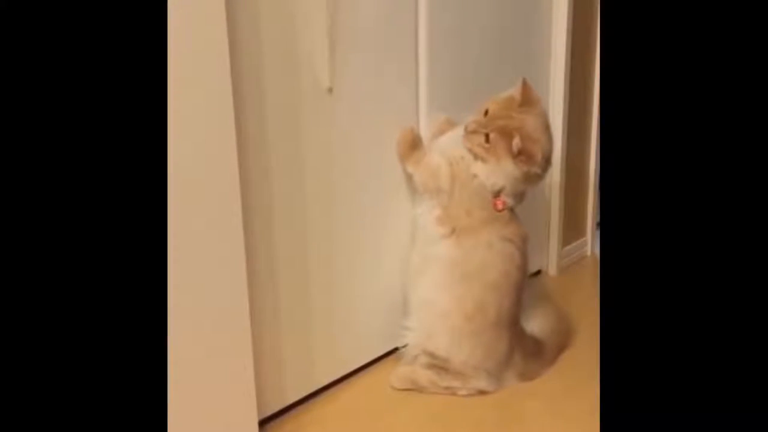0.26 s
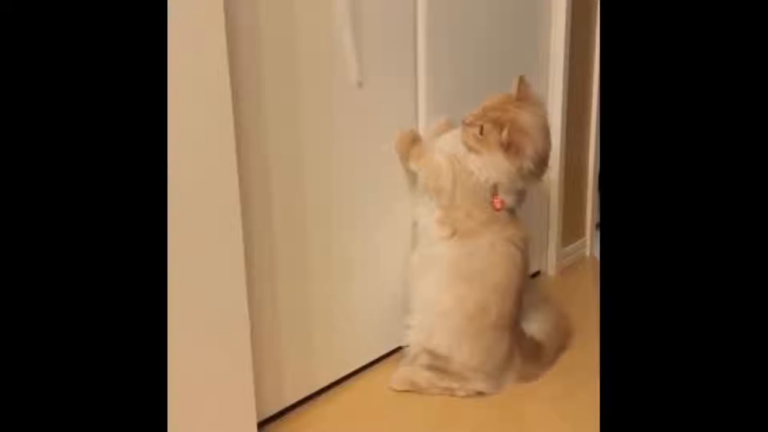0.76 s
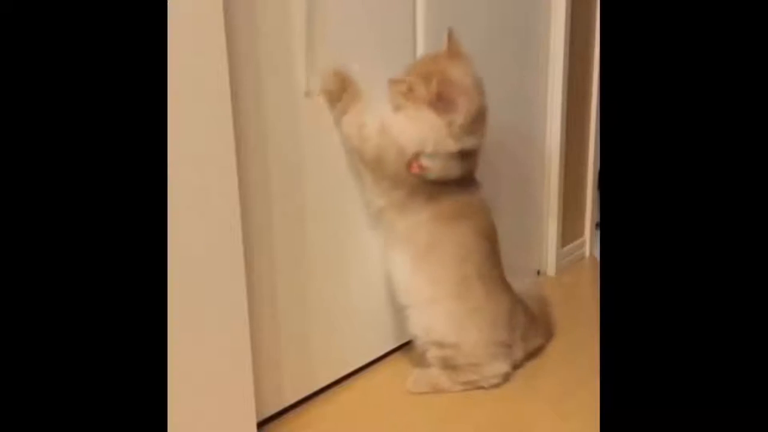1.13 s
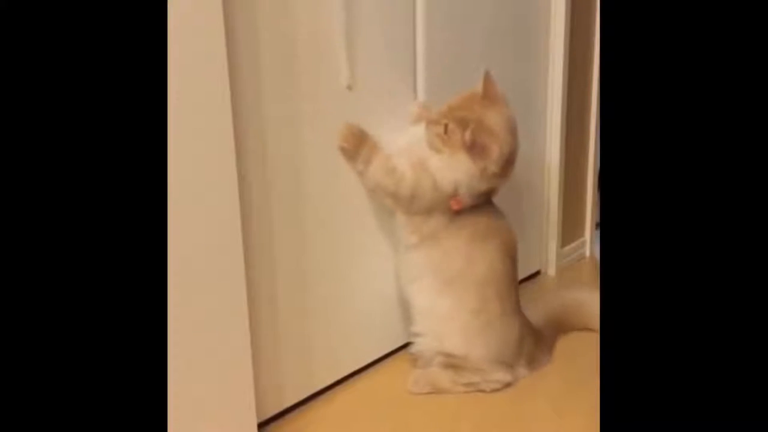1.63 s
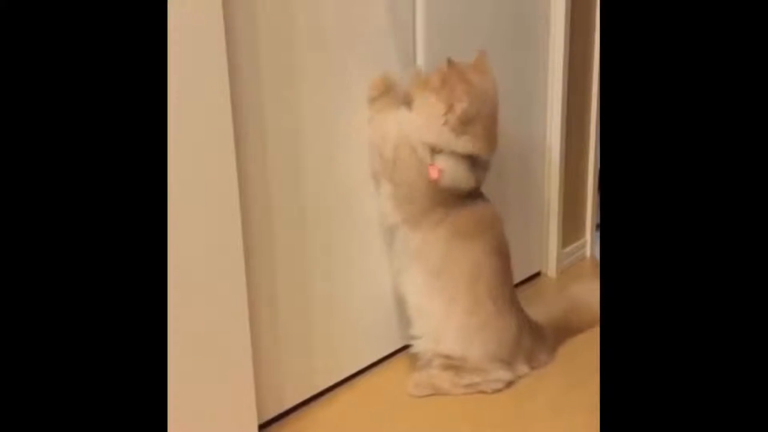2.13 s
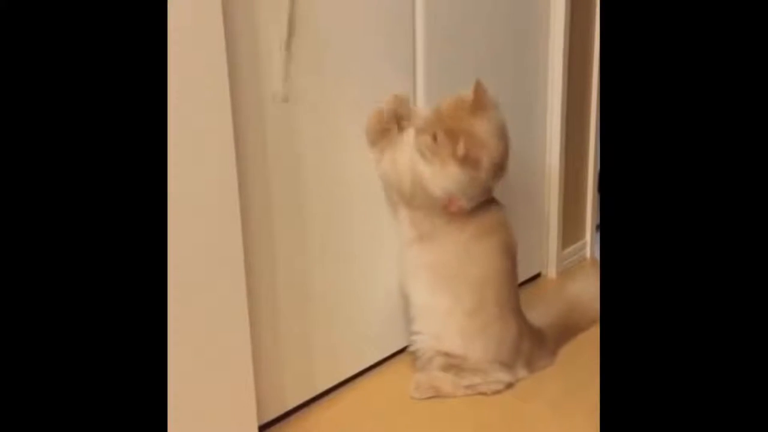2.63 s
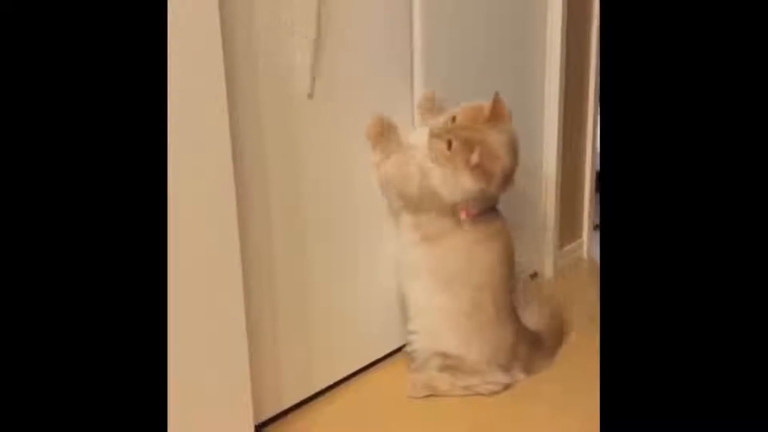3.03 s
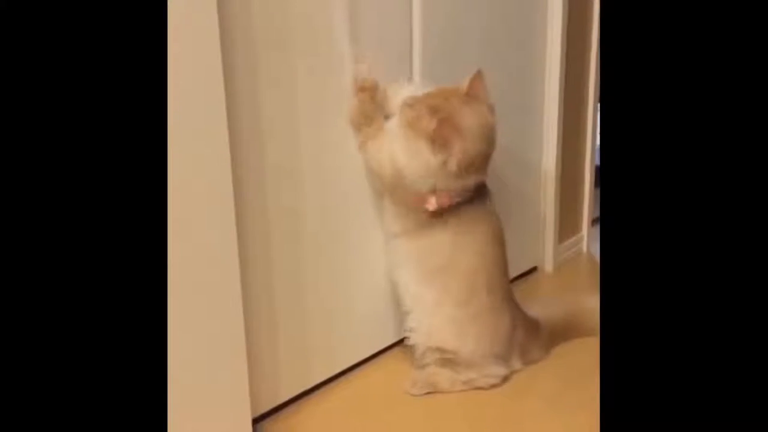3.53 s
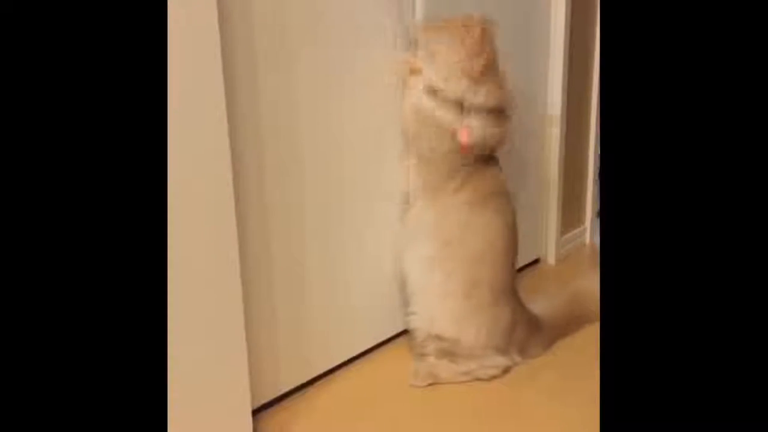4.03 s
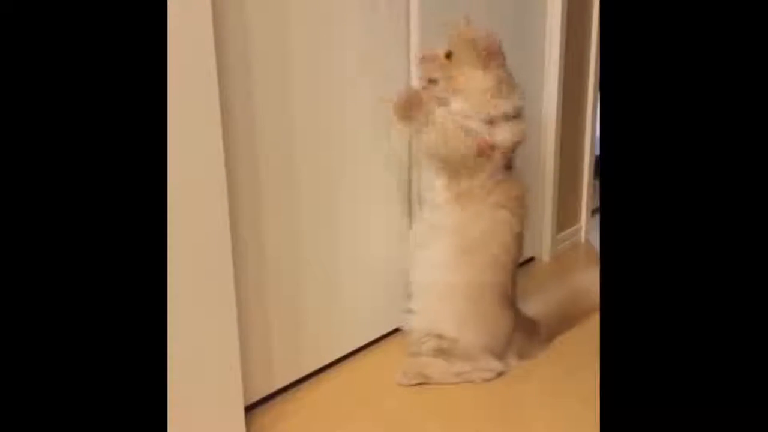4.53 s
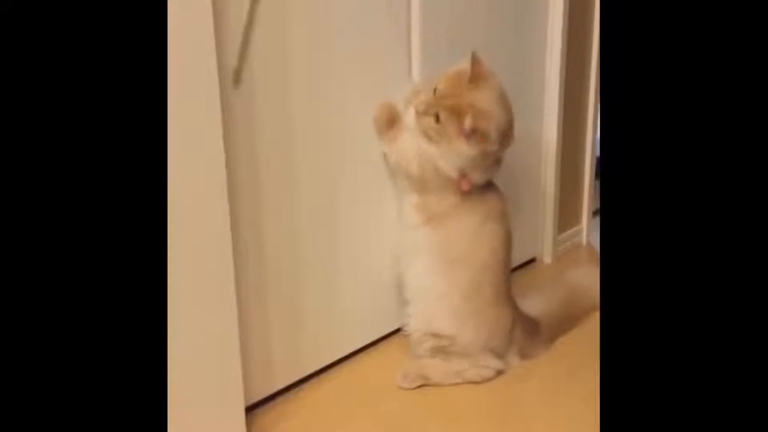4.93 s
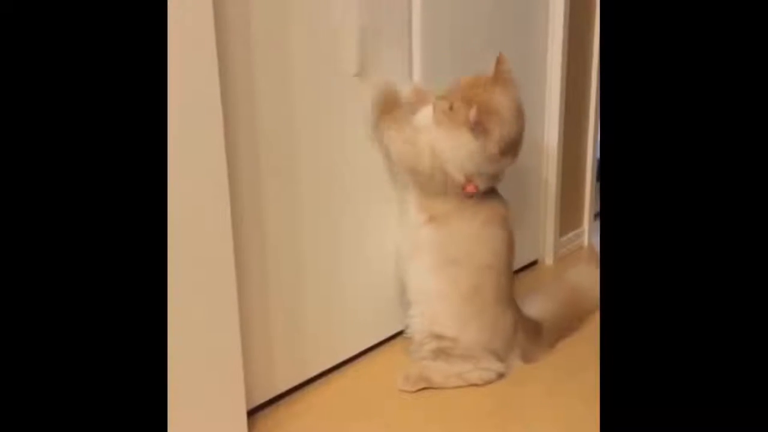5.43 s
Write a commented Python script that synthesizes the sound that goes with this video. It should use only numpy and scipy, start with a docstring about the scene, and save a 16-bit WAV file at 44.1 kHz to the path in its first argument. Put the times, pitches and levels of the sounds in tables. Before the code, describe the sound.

A faint, low electrical hum with rumble and hiss runs throughout in a small room. Around 0.5 seconds a cat's claws brush very softly on a closet door. From 1 to 1.4 seconds come short scratches, soft paw thuds, light knocks and muffled clinks of its collar bell. Just after 2 seconds the claws rasp harder and the small, high bell jingles brightly, with a thud and a loud clack of the loose door at 2.3 seconds. Light taps follow, then a short lull. Sharp scratches at 3.4 seconds lead into a quick cluster of hard knocks at 3.5. The bell then jingles busily until about 4.7 seconds, with lighter scrapes and another thud and knock near 4.3. One more knock lands at 5 seconds, followed by softer jingles, a tap and faint clinks until about 5.6.

```python
"""In a small room, a cat stands up and paws at a closet door.
Its claws stick and slip down the panel, its soft paws thud, and the loose door knocks in its track.
A pellet in the bell on its collar hits the shell as the cat moves: a bright jingle, or a dull clink
when fur presses on the bell. A low, steady electrical hum, a rumble and a faint hiss lie underneath."""
import sys
import numpy as np
from scipy import signal
from scipy.fft import next_fast_len
from scipy.io import wavfile
from scipy.ndimage import uniform_filter1d

SR = 44100
rng = np.random.default_rng(int(sys.argv[2]) if len(sys.argv) > 2 else 0)


def generate_wav(signal):
    """Clip the signal to [-1, 1] and save it as 16-bit WAV at the path in sys.argv[1]."""
    frames = np.transpose(np.atleast_2d(signal))
    scaled = np.clip(frames, -1, 1) * 32767
    pcm = np.round(scaled).astype(np.int16)
    wavfile.write(sys.argv[1], SR, pcm)


N = 250488
AGE = np.arange(SR // 2) / SR  # seconds since a hit

# Table levels are relative. ring_s is the time a sound takes to die away by 60 dB.
# The tones of an electrical hum, as from a compressor motor and the mains: pitch_hz, level_db
HUM_TONES = [(59.2, -59), (118.4, -54.5), (177.6, -69.5), (296.1, -85), (398.4, -87), (473.7, -91.5),
             (597.5, -86.5)]
# Tone colour (how strong each pitch is) of the rumble and the hiss: pitch_hz, level_db
RUMBLE_COLOUR = [(15, -22), (35, -2.5), (60, 4.5), (110, 0.5), (170, -1.5), (260, -22.5), (500, -56)]
HISS_COLOUR = [(130, -37.5), (220, -3), (397, -4), (426, -9.5), (464, -6), (603, -10), (756, -11),
               (1070, -14.5), (2180, -15.5), (4600, -18), (14000, -24)]

# Claw strokes: hardest_pull_s, level_db, swell_s, fade_s, fizz_db (added to level_db), pitch_hz
CLAW_STROKES = [(.365, -72.5, .05, 0.17, -20, 1950), (0.505, -64, 0.088, 0.13, -23, 1476),
                (1.021, -64.5, 0.034, 0.022, -9, 1480), (1.098, -56.5, .012, .04, -15, 1550),
                (1.14, -45, .045, 0.032, -17.5, 1610), (1.224, -47, 0.024, 0.033, -12, 1600),
                (1.735, -67.5, .09, 0.1, -28, 1420), (2.119, -41, 0.024, 0.076, -14, 1944),
                (2.218, -42.5, 0.055, 0.057, -9.5, 2115), (3.21, -67.5, .2, 0.13, -14, 2330),
                (3.258, -60.5, .025, 0.026, -22, 1850), (3.368, -38, .026, 0.013, -12.5, 1590),
                (3.399, -41.5, 0.028, 0.035, -7.5, 1963), (3.694, -47, 0.023, 0.021, -8.5, 1590),
                (3.882, -55, 0.081, 0.098, -23, 1900), (4.021, -59, 0.061, 0.018, -8, 1900)]
# Tone colour of the scraped panel and of the claws' high fizz: pitch_hz, level_db
SCRAPE_COLOUR = [(300, -23), (1100, -17), (1440, 3.5), (1780, -10.5), (2200, -3), (3000, -3.5), (4500, -3),
                 (7000, -13)]
FIZZ_COLOUR = [(2000, -2), (3800, 10.5), (5200, 9.5), (8000, 5), (10500, -4.5), (14000, -9)]

LOW_HZ, HIGH_HZ, DAMPED_HZ = 5594, 13852, 6290  # the bell's two notes, and its note against fur
# Clinks of the bell against fur: start_s, tone_db, tick_db
BELL_CLINKS = [(1.0221, -69.5, -68), (1.299, -59, -66), (1.3285, -64, -74), (2.713, -84, -61),
               (3.289, -68, -68), (3.343, -50.5, -62), (3.4125, -50, -56), (3.861, -64, -67),
               (4.7227, -65, -63), (4.891, -63, -57), (4.9477, -78, -61), (5.1659, -61, -60.5),
               (5.598, -66, -60.5), (5.638, -64, -60.5)]
# The tones of the muffled bell: pitch_hz, level_db, ring_s
MUFFLED_TONES = [(DAMPED_HZ, 0, 0.073), (DAMPED_HZ + 110, -10, 0.034)]
# Tone colour of the pellet rattling on the shell: pitch_hz, level_db
RATTLE_COLOUR = [(2000, -14), (4800, -8), (5600, -2), (6400, 4), (7400, -2), (7900, 5.5), (8400, 3),
                 (9000, 0.5), (9600, -9.5), (12800, -11), (13800, -6)]

# Knocks of the door in its track: start_s, level_db, crack_db, wood_db (both added to level_db), pitch_hz
DOOR_KNOCKS = [(1.2245, -43.5, -27, -18, 1550), (1.3102, -50, -18, -9, 1710), (1.773, -55, -28, -25, 1370),
               (2.3126, -35.5, -8, -7, 2070), (2.3153, -28, -17, -13, 1600),
               (2.5895, -49.5, -25, -13.5, 2400), (2.7511, -51, -16, -7, 2190),
               (3.499, -34, -3.5, -19, 2000), (3.5057, -32.5, -17, -17, 1740),
               (3.5217, -31.5, -13.5, -19.5, 1800), (4.0247, -51, -3, -11.5, 1830),
               (4.3186, -35, -14.5, -11.5, 2030), (4.3792, -41, -20, -18, 1530),
               (4.9924, -37.5, -17, -15, 1960), (5.306, -49.5, -16.5, -21, 2430)]
# Tone colour of the panel's clack, the hard crack and the hollow wood: pitch_hz, level_db
PANEL_COLOUR = [(500, -34), (1100, -8.5), (1450, -5), (2000, -4.5), (2600, -8.5), (3200, -4.5), (3650, -11),
                (4050, -8), (5000, -12), (8000, -14.5)]
CRACK_COLOUR = [(1500, -1), (3200, 4.5), (4200, 0.5), (5200, 0.5), (8000, 1.5), (10500, -6.5), (14000, -7)]
WOOD_COLOUR = [(150, -6), (260, -2), (400, 0.5), (600, -2.5), (790, -1.5), (980, -0.5), (1200, -6.5),
               (1600, -8), (3000, -26.5)]

# A paw lands and shoves the door, or the door settles back after a shove: start_s, thud_db, sway_db
DOOR_THUMPS = [(1.228, -47, -46), (1.308, -40, -34.5), (1.402, -60, -54), (2.096, -40, -54),
               (2.305, -37.5, -48), (3.499, -40, -43), (4.317, -43, -46), (4.8227, -59.5, -55)]
# The tones of the door as it bends, and as all of it sways: pitch_hz, level_db, ring_s
BEND_TONES = [(107.3, -8.5, 0.48), (146, -11, 0.18), (199, 4.5, 0.06), (228.3, -2.5, 0.082),
              (252.5, 2, 0.069), (288.2, 1, 0.096), (371.6, -11, 0.14), (465, -13, 0.085)]
SWAY_TONES = [(35.5, 1, 0.56), (55.2, 17, 0.35), (73, 15, 0.78)]

# The pellet hits the free bell: start_s, level_db, high_note_db (added to level_db)
BELL_JINGLES = [(2.126, -47.5, -27), (2.1455, -48.5, -12), (2.191, -49, -26), (2.2085, -52, -29),
                (2.37, -46, -22), (2.388, -49.5, -8), (2.5168, -52, -21), (3.5516, -50, -11),
                (3.5833, -46.5, -14), (3.605, -41, -17), (3.664, -49.5, -5.5), (3.7175, -47.5, -10),
                (3.7877, -57, -8), (3.9058, -52, -22), (4.0435, -47, -10), (4.0891, -49.5, -7),
                (4.144, -48.5, -8.5), (4.2994, -51, -12), (4.337, -43, -14), (4.4144, -42.5, -23),
                (4.4428, -45.5, -12), (4.481, -48.5, -20), (4.5053, -41, -16), (4.571, -53.5, -17),
                (4.695, -52.5, -20), (5.0501, -50, -28), (5.1002, -57, -28), (5.1932, -55, -17)]
# The close tones that make up the bell's low note and high note: pitch_hz, level_db, ring_s
LOW_NOTE_TONES = [(LOW_HZ, 0, 0.11), (LOW_HZ - 60, -9.5, 0.022), (LOW_HZ + 130, -4, 0.02)]
HIGH_NOTE_TONES = [(HIGH_HZ, 0, 0.25), (HIGH_HZ - 110, -3, 0.059)]

# How long the room echoes: pitch_hz, ring_s
ROOM_ECHO = [(100, 0.39), (500, 0.3), (2000, 0.24), (6000, 0.33), (14000, 0.16)]


def gain_of(db):
    """Turns decibels into a number to multiply a sound by."""
    return 10 ** (np.asarray(db) / 20)


def evened(x):
    """Scales a sound so that its average strength (rms) is 1."""
    return x / np.sqrt(np.mean(x ** 2) + 1e-20)


def struck(x, size=441):
    """Scales a hit so that its loudest moment has strength 1."""
    return x / np.sqrt(uniform_filter1d(x ** 2, size, mode="constant").max() + 1e-20)


def look_up(points, hz):
    """Reads a table at any pitch, blending between its rows."""
    pitches, values = np.transpose(points)
    return np.interp(np.log(hz + 1), np.log(pitches + 1), values)


def add(mix, start_s, sound):
    """Mixes a sound in at the given time."""
    part = mix[max(round(start_s * SR), 0):][:len(sound)]
    part += sound[:len(part)]


def colour(x, points):
    """Gives a sound a tone colour without smearing it back in time."""
    size = next_fast_len(len(x) + 2048)
    hz = abs(np.fft.fftfreq(size, 1 / SR))
    log_gain = np.log(gain_of(look_up(points, hz)))
    response = np.exp(np.conj(signal.hilbert(log_gain)))
    return np.fft.ifft(np.fft.fft(x, size) * response).real[:len(x)]


def drift(rate_hz, count=12):
    """A random wobble of strength 1, no faster than rate_hz."""
    t = np.arange(0, N, 128) / SR
    slow = sum(np.sin(2 * np.pi * (rate_hz * rng.uniform(.1, 1) * t + rng.random()))
               for _ in range(count))
    return np.interp(np.arange(N) / SR, t, evened(slow))


def ring(tones, spread_db=0.):
    """A hit object rings with dying tones; where it is hit changes how loud each one is."""
    return sum(gain_of(db + spread_db * rng.standard_normal() - 60 * AGE / ring_s)
               * np.sin(2 * np.pi * hz * AGE) * (-1) ** k
               for k, (hz, db, ring_s) in enumerate(tones))


def burst(points, ring_s):
    """Many close tones dying together sound like a puff of noise."""
    noise = rng.standard_normal(len(AGE)) * gain_of(-60 * AGE / ring_s)
    return struck(colour(noise, points))


def resonate(x, hz, width_hz):
    """Brings out a band around one pitch, which may slide."""
    turn = np.exp(2j * np.pi * np.cumsum(hz * np.ones(len(x))) / SR)
    decay = np.exp(-np.pi * width_hz / SR)
    return (turn * signal.lfilter([1 - decay], [1, -decay], x / turn)).real


def background(waver_db=1.65, rumble_db=-63, hiss_db=-70.5):
    """A low electrical hum wavers a little over the room's rumble and hiss."""
    t = np.arange(N) / SR
    hum = sum(gain_of(db + waver_db * drift(8.8))
              * np.sqrt(2) * np.sin(2 * np.pi * (hz * t + rng.random())) for hz, db in HUM_TONES)
    rumble = evened(colour(rng.standard_normal(N), RUMBLE_COLOUR))
    hiss = evened(colour(rng.standard_normal(N), HISS_COLOUR))
    return hum + gain_of(rumble_db) * rumble + gain_of(hiss_db) * hiss


def panel_ringing(x, ring_s=0.033, share=0.87):
    """Adds the short, uneven ringing of the panel where the claws touch it."""
    tail = rng.standard_normal(len(AGE)) * gain_of(-60 * AGE / ring_s)
    return x + share * signal.fftconvolve(x, tail / np.linalg.norm(tail))[:len(x)]


def claw_scrapes(slips_per_s=1800, grit=0.074, waver_db=2.14, sink_octaves_per_s=1.2, hard_pull_db=-43):
    """Claws stick and slip, which rings the panel; the pitch sinks as the paw slides down."""
    out = np.zeros(N)
    for pull_s, level, swell_s, fade_s, fizz_db, pitch_hz in CLAW_STROKES:
        t = np.arange(-1.6 * swell_s, 1.6 * fade_s, 1 / SR)
        # the uneven pull rises 20 dB in swell_s and falls 20 dB in fade_s
        pull_db = level - 20 * np.maximum(-t / swell_s, t / fade_s) + waver_db * drift(45)[:len(t)]
        centre_hz = pitch_hz * 2 ** (-sink_octaves_per_s * t)
        sizes = gain_of(0.5 * np.minimum(rng.exponential(1, SR), 3)) * rng.choice([-1, 1], SR)
        slips = sizes * (rng.random(SR) < slips_per_s / SR)
        rubbing = (slips + grit * rng.standard_normal(SR))[:len(t)]
        panel = resonate(colour(rubbing, SCRAPE_COLOUR), centre_hz, width_hz=1700)
        # a harder pull rings a wider band of pitches
        panel = resonate(panel, centre_hz, width_hz=3600 * gain_of(0.67 * (level - hard_pull_db)))
        squeak = evened(resonate(panel, centre_hz, width_hz=25))
        rasp = evened(evened(panel_ringing(panel)) + 0.5 * squeak)
        fizz = gain_of(fizz_db + 1) * evened(colour(rubbing, FIZZ_COLOUR))
        loudness = gain_of(pull_db - 1) * signal.windows.tukey(len(t), .08)
        add(out, pull_s + t[0], loudness * (rasp + fizz))
    return out


def bell_echo(hz, width_hz, ring_s, swell_s=0.014):
    """A note of the moving bell comes back from the walls as a shimmer around its pitch."""
    decay = np.exp(-np.pi * width_hz / SR)
    shimmer = rng.standard_normal((2 * len(AGE), 2)) @ [1, 1j]
    for _ in range(2):
        shimmer = signal.lfilter([1 - decay], [1, -decay], shimmer)
    wave = (shimmer[len(AGE):] * np.exp(2j * np.pi * hz * AGE)).real
    return evened(wave) * gain_of(-60 * AGE / ring_s) * (1 - np.exp(-AGE / swell_s))


def bell_clinks(swell_s=.002):
    """Pressed into the fur, the bell gives only a short clink and a tick of the pellet."""
    out = np.zeros(N)
    swell = 1 - np.exp(-AGE / swell_s)
    for start_s, tone_db, tick_db in BELL_CLINKS:
        tone = struck(ring(MUFFLED_TONES)) + gain_of(-9) * bell_echo(DAMPED_HZ, 190, ring_s=0.35)
        tick = burst(RATTLE_COLOUR, ring_s=0.1)
        add(out, start_s, (gain_of(tone_db - 1) * tone + gain_of(tick_db - 1) * tick) * swell)
    return out


def door_knocks(hard_knock_db=-30, wood_swell_s=0.003):
    """The loose door hits its track: a hard crack, a clack of the panel and a hollow wooden note."""
    out = np.zeros(N)
    for start_s, level, crack_db, wood_db, pitch_hz in DOOR_KNOCKS:
        # a gentle knock rings a narrower band and takes longer to land
        width_hz = 550 * gain_of(0.12 * (level - hard_knock_db))
        landing_s = 0.00074 * gain_of(0.24 * (hard_knock_db - level))
        clack = gain_of(-6) * struck(resonate(burst(PANEL_COLOUR, ring_s=0.039), pitch_hz, width_hz))
        crack = gain_of(crack_db + 1) * burst(CRACK_COLOUR, ring_s=.025)
        hit = (clack + crack) * np.minimum(AGE / landing_s, 1)
        hollow = gain_of(wood_db) * burst(WOOD_COLOUR, ring_s=0.047) * (1 - np.exp(-AGE / wood_swell_s))
        add(out, start_s, gain_of(level) * (hit + hollow))
    return out


def door_thumps(swell_s=0.0058):
    """A soft paw lands, or the door settles back, with a hollow thud, bending the door and making all of it
    sway."""
    out = np.zeros(N)
    for start_s, thud_db, sway_db in DOOR_THUMPS:
        hollow = gain_of(thud_db - 7) * burst(WOOD_COLOUR, ring_s=0.093)
        # the door sits differently in its track at each thump, which shifts its tones
        tones = [(hz * rng.uniform(.96, 1.04), db, ring_s) for hz, db, ring_s in BEND_TONES]
        bend = gain_of(thud_db) * struck(ring(tones, spread_db=1.4))
        sway = gain_of(sway_db - 4.5) * struck(ring(SWAY_TONES, spread_db=6.1))
        add(out, start_s, (hollow + bend + sway) * (1 - np.exp(-AGE / swell_s)))
    return out


def pellet_bounces(gap_s=0.0036, loss_db=2.5, count=5):
    """The pellet lands, then bounces at uneven gaps, weaker each time."""
    times_s = np.cumsum(gap_s * rng.uniform(0.25, 2.3, count))
    samples = np.minimum((times_s * SR).astype(int), len(AGE) - 1)
    hits = np.zeros(len(AGE))
    hits[0] = 1
    hits[samples] += gain_of(-loss_db * (2 + np.arange(count)))
    return hits


def pellet_strike(low_db, high_db, rattle_db, flutter_db=2.2, tone_swell_s=0.0021, rattle_swell_s=.0025):
    """The pellet hits and rattles; the shell rings with two notes that waver against their echoes."""
    low = struck(ring(LOW_NOTE_TONES, spread_db=1.43))
    low += gain_of(-5) * bell_echo(LOW_HZ, width_hz=116, ring_s=0.24)
    high = struck(ring(HIGH_NOTE_TONES, spread_db=1.7))
    high += gain_of(-5) * bell_echo(HIGH_HZ, width_hz=27, ring_s=0.25)
    ticks = signal.fftconvolve(pellet_bounces(), burst(RATTLE_COLOUR, ring_s=0.065))[:len(AGE)]
    rattle = struck(ticks) + gain_of(-2) * burst(RATTLE_COLOUR, ring_s=0.25)
    # the swinging bell turns its slit towards us and away, so each note flutters
    tone = sum(gain_of(db + flutter_db * drift(55)[:len(AGE)]) * note
               for db, note in ((low_db, low), (high_db, high)))
    tone *= 1 - np.exp(-AGE / tone_swell_s)  # builds while the pellet rolls on the shell
    return tone + gain_of(rattle_db) * rattle * (1 - np.exp(-AGE / rattle_swell_s))


def bell_jingles(roll_back_s=.032, roll_loss_db=17):
    """Each toss of the collar gives one firm strike and a weaker one as the pellet rolls back."""
    out = np.zeros(N)
    for start_s, level, high_db in BELL_JINGLES:
        back_s = roll_back_s * rng.uniform(0.67, 1.33)
        rattle_db = -19 - 0.29 * high_db  # a glancing strike has less high note and more rattle
        for at_s, db in (start_s, level), (start_s + back_s, level - roll_loss_db):
            add(out, at_s, pellet_strike(db + 1, db + high_db + 1, db + rattle_db))
    return out


def room_echo(x, delay_s=0.006, echoes_per_s=3000):
    """Sound bounces off the nearby walls, and each pitch dies away at its own speed."""
    echoes = rng.choice([-1., 1.], len(AGE)) * (rng.random(len(AGE)) < echoes_per_s / SR)
    hz, t, bands = signal.stft(echoes * (AGE > delay_s), SR, nperseg=256)
    fade = gain_of(-60 * t / look_up(ROOM_ECHO, hz)[:, None])
    tail = signal.istft(bands * fade, SR, nperseg=256)[1]
    return signal.fftconvolve(x, tail / np.linalg.norm(tail))[:N]


def scene():
    """The door and claws echo in the room; the bell brings its own echoes."""
    door = door_knocks() + door_thumps()
    scrapes = claw_scrapes()
    echo = room_echo(gain_of(-4) * door + gain_of(-9) * scrapes)
    return (bell_jingles() + bell_clinks() + door + scrapes + echo + background())[None]


def record(dry):
    """Cuts away the very highest treble, above 14200 Hz."""
    treble_cut = signal.firwin(301, 14200, window=("kaiser", 8), fs=SR)
    return signal.oaconvolve(dry, treble_cut[None], "same")


dry = scene()
out = record(dry)
generate_wav(out)
```